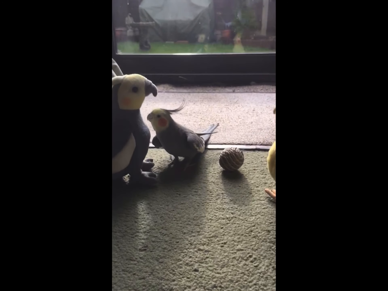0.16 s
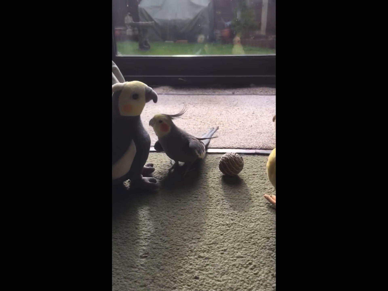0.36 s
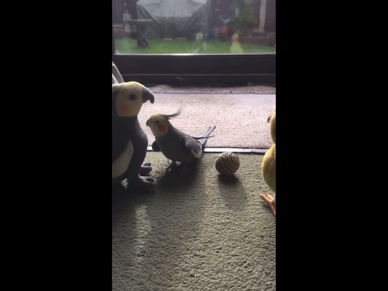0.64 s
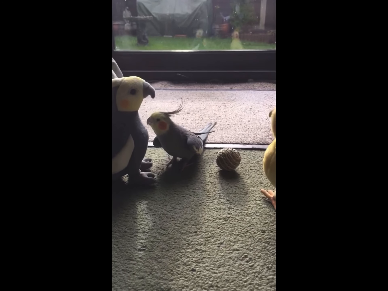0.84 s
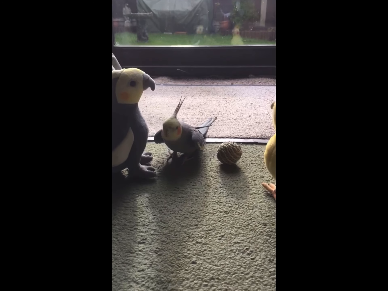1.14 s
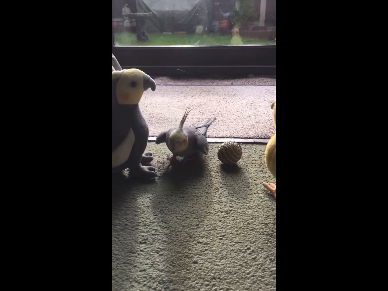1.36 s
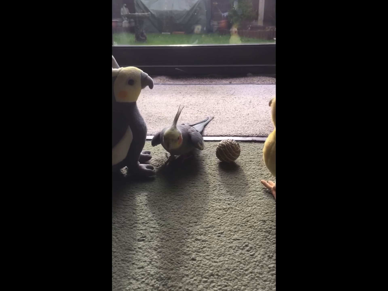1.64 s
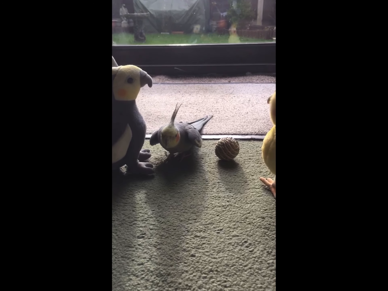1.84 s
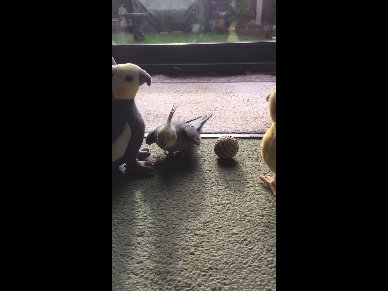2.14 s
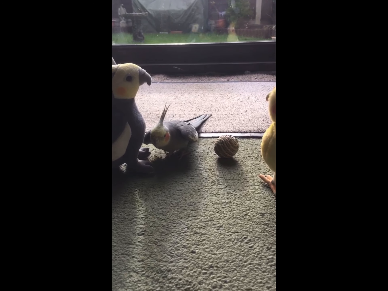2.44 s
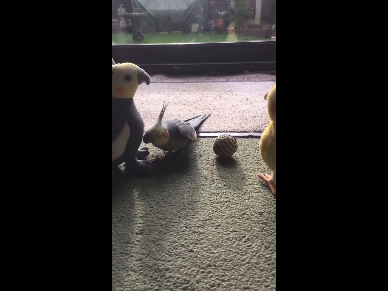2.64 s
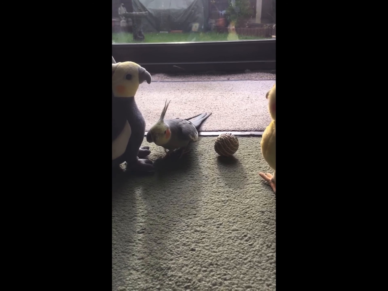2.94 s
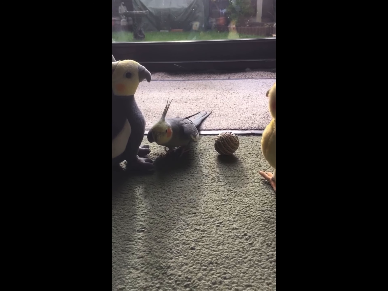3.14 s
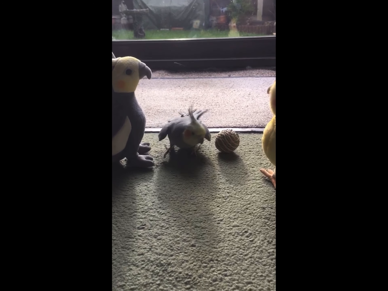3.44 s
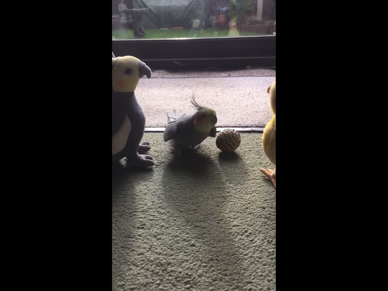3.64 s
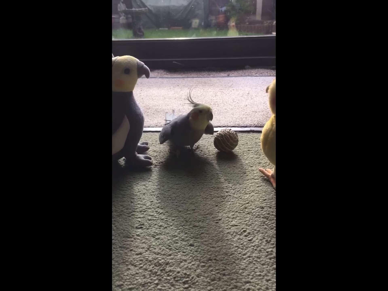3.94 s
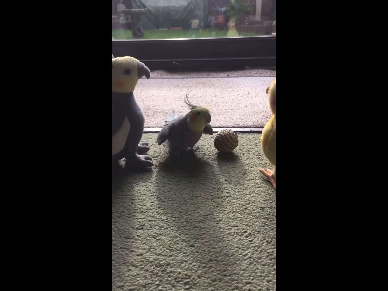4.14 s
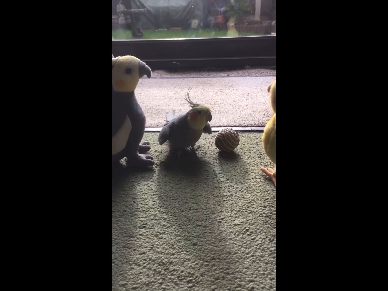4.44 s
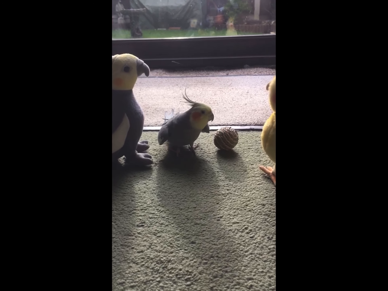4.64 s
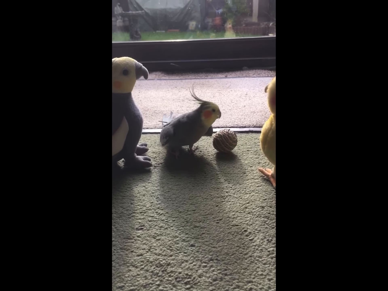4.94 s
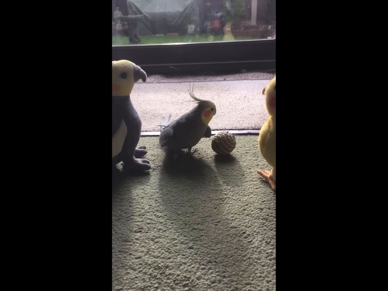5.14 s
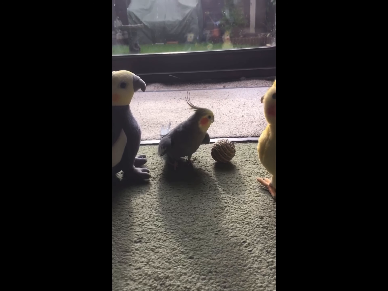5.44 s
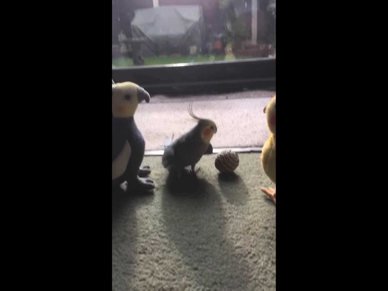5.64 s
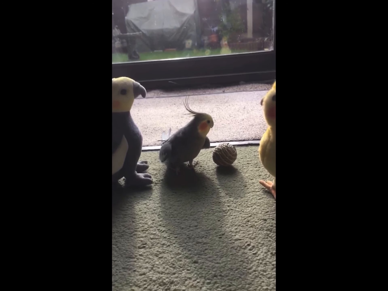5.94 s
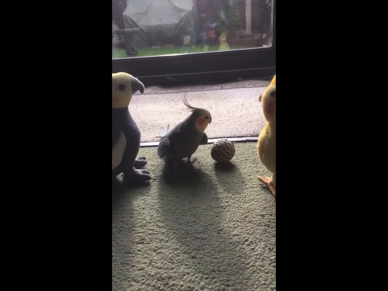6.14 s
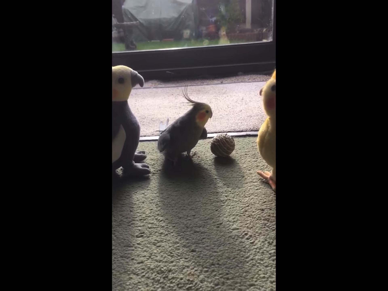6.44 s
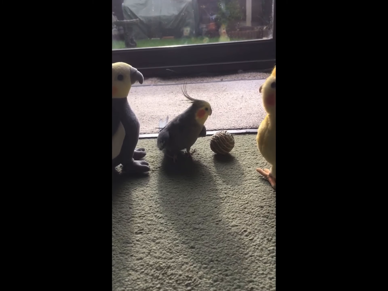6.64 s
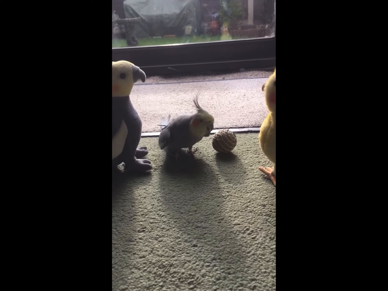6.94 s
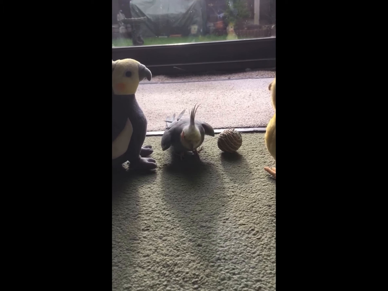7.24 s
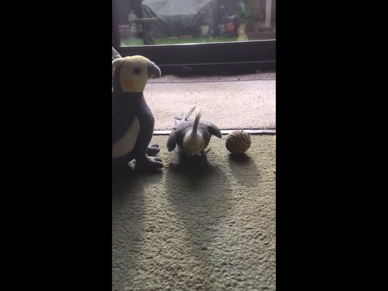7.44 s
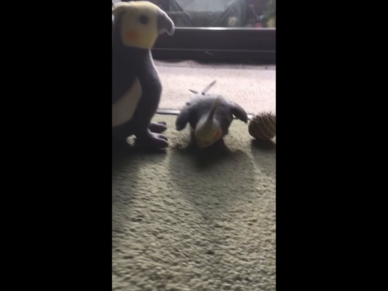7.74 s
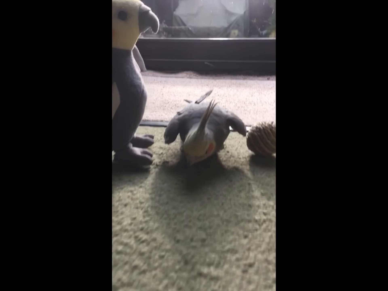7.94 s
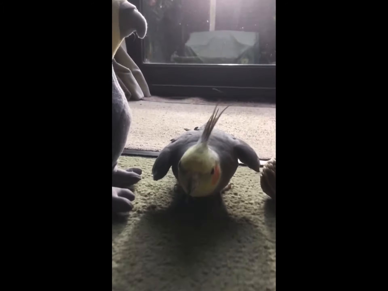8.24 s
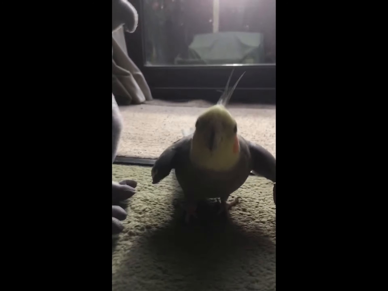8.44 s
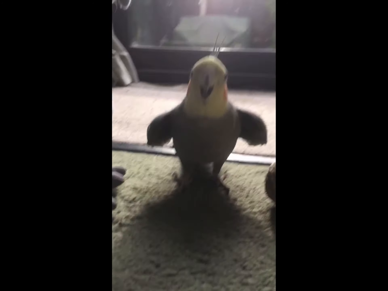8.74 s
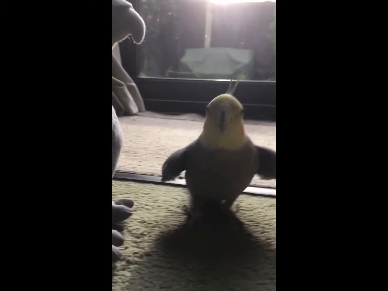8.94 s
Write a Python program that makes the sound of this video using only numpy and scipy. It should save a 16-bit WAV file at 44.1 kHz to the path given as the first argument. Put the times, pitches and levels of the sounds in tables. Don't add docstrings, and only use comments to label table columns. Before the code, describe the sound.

In a soft, carpeted living room with a short decay, a small parrot whistles over a very faint steady low hum. The tail of a closing note is heard at 0 s, then phrases begin near 0.7, 1.6, 2.75, 3.5, 4.5, 5.3, 6.5, 7.2 and 8.1 s. Each lasts about half a second: a short rising note near 1.1 kHz, a low swell, a fast leap to a thin whistle around 2.4 kHz, a drop with a tiny click, then a strong closing note near 2 kHz. Purer soft openings alternate with brighter bold ones. A tiny gulp falls at 5 s; a broken-off note comes at 6.4 s. From 7.6 s the phone microphone scuffs along carpet, hissing hardest around 8.4 to 8.5 s, with low bumps and sharp ticks from 8.2 to 8.8 s. The close phrase is loudest; scuffing fades, and another phrase is cut off at 9.1 s.

```python
import sys
import numpy as np
from scipy import signal
from scipy.fft import rfft, irfft
from scipy.io import wavfile
from scipy.ndimage import uniform_filter1d

SR = 44100
rng = np.random.default_rng(int(sys.argv[2]) if len(sys.argv) > 2 else 0)


def convert_level_to_amplitude(level_db):
    exponent = np.asarray(level_db, float) / 20
    return 10 ** exponent


def transcribe(u):
    v = np.clip(np.atleast_2d(u).T, -1, 1)
    q = np.round(v * 32767).astype(np.int16)
    wavfile.write(sys.argv[1], SR, q)


N = 400869

# frequency in Hz, density in dB per Hz.
HOUSE_SPECTRUM = [(24, -22.5), (40, -9.5), (90, -3.), (125, -6.5), (262, -6), (320, -13), (440, -18.5),
                  (1130, -21), (2300, -32.5), (6000, -41.5), (15900, -43.5)]
# frequency in Hz, width in Hz, lift in dB.
HOUSE_MODES = [(45.6, 14, 10), (83.5, 6.7, 6.5), (161, 5.9, 10), (211, 8.3, 7), (635, 100, 8.5)]
# time in seconds, level in dB.
HOUSE_LEVEL = [(0, -55), (9.09, -54)]
# time in seconds, scuff in dB, fibre hiss in dB.
SLIDE = [
    (7.6, -52, -72),
    (7.78, -54.5, -77),
    (7.92, -47, -73),
    (8.1, -51, -66),
    (8.38, -44, -50),
    (8.5, -53, -47),
    (8.72, -56.5, -72),
    (9.09, -68.5, -84),
]
# frequency in Hz, density in dB per Hz.
SCUFF_SPECTRUM = [(200, -29.5), (300, -10), (440, -10), (700, -5.5), (3000, -9), (9000, -26)]
# time in seconds, peak in dB, ring in Hz.
BUMPS = [
    (8.249, -36, 83.4),
    (8.33, -33, 88),
    (8.429, -31, 90),
    (8.456, -24.5, 53.8),
    (8.677, -36.5, 43.1),
    (8.789, -39, 43.1),
]
# time in seconds, peak in dB, ring in Hz, ring time in quarter milliseconds.
TICKS = [
    (7.069, -66.5, 780, 2.7),
    (8.232, -37, 812, 2.1),
    (8.416, -20.5, 750, 0.78),
    (8.54, -31, 800.0, 1.9),
]
# centre in Hz, T60 in seconds.
ROOM_T60 = [(700, 0.27), (1400, 0.19), (2800, 0.19), (5600, 0.18), (11200, 0.12)]
EARLY_LIFT, EARLY_S = 0.6, 0.025

# frequency in Hz, gain in dB.
THROAT = [(2000, 0.5), (2800, -4.5), (3900, -0.5), (5000, -11.5), (6000, -13), (7000, -8.5)]
# frequency in Hz, gain in dB.
BEAK = [(7000, -5), (8500, -3.5), (10000, -6.5), (12000, 4), (14000, -3.5), (16500, -5)]
# start in seconds, end in seconds, dB re fundamental.
DOUBLING = [(1.665, 1.76, -25), (4.596, 4.71, -24.5)]
# start in seconds, end in seconds, level in dB, offset above tone in Hz.
STRAIN = [(3.05, 3.119, -30, 440), (8.493, 8.521, -21, 421)]
# time in seconds, room share in dB, then lifts in dB of the upper throat,
# the beak and the lowest overtone.
STANCE = [(0.05, 6, -8, -4.5, 1), (0.85, 0, -8, -2.2, 5.5), (1.2, -2, -2, 2.5, 7),
          (1.7, -2.5, -2.5, 0.1, -6), (2.05, 0, -7.5, 1.5, 3.5), (2.85, -2, -9, 1.5, 4),
          (3.2, 0.5, 1, 2.5, 6.3), (3.62, -4.5, 2.5, 2, -2), (4.0, -1.5, -2, -3.5, 6.8),
          (4.6, -6.5, -9, 3.5, -1.8), (4.95, 3.5, -7, -4.3, 3.5), (5.55, 0, -7.5, -1.7, -4.7),
          (6.55, -2.5, -24, 1, 6), (6.9, 3.5, -7.5, -6, 5.2), (7.3, -2, 9.5, 8, -4),
          (7.6, -3, -17, 2.5, -6.5), (8.5, -10.5, 6, 8, 6), (9.05, -5.5, -10.5, -12.5, 3.5)]

# start in seconds, crest in seconds, crest in Hz,
# fundamental in dB, overtones in dB.
OPENINGS = [(0.735, 0.814, 1133, -43.5, -42.5), (1.596, 1.668, 1336, -37, -36.5),
            (2.752, 2.79, 1000, -40.5, -51), (3.533, 3.606, 1317, -36.5, -35.5),
            (4.481, 4.548, 1173, -37.5, -37.5), (5.287, 5.348, 1279, -40.5, -40.5),
            (6.479, 6.505, 1100, -35.5, -49.5), (7.197, 7.3, 1273, -36, -40.5),
            (8.142, 8.241, 1112, -31, -42), (8.983, 9.045, 1103, -34.5, -36.5)]
FALSE_START = (6.385, 6.417, 1006, -39.5, -59)
# foot in seconds, foot in Hz, crest in seconds, crest in Hz, valley in seconds.
SWELLS = [(0.87, 1025, 0.94, 1350, 0.99), (1.698, 1287, 1.784, 1380, 1.812),
          (2.84, 1015, 2.93, 1300, 2.995), (3.674, 1420, 3.722, 1600, 3.755),
          (4.622, 1083, 4.675, 1422, 4.729), (5.396, 1330, 5.462, 1406, 5.484),
          (6.535, 1072, 6.603, 1305, 6.665), (7.33, 1350, 7.368, 1400, 7.423),
          (8.291, 1012, 8.357, 1350, 8.425), (9.067, 1260, 9.1, 1400, 9.13)]
# leap in seconds, top in seconds, release in seconds, top in Hz.
ARCHES = [(1.003, 1.075, 1.094, 2455), (1.838, 1.922, 1.935, 2501), (3.012, 3.093, 3.108, 2547),
          (3.793, 3.859, 3.881, 2392), (4.739, 4.808, 4.834, 2405), (5.52, 5.599, 5.617, 2492),
          (6.673, 6.748, 6.763, 2425), (7.439, 7.508, 7.529, 2410), (8.428, 8.514, 8.524, 2545)]
# ledge in seconds, crest in seconds,
# end in seconds, ledge in Hz, crest in Hz.
CLOSINGS = [(-0.026, 0.046, 0.078, 1780, 2085), (1.167, 1.239, 1.273, 1720, 2050),
            (2.011, 2.083, 2.117, 1835, 2102), (3.183, 3.253, 3.267, 2005, 2065),
            (3.961, 4.037, 4.059, 1710, 1976), (4.915, 4.989, 5.021, 1760, 2074),
            (5.699, 5.777, 5.811, 1790, 2043), (6.838, 6.912, 6.938, 1900, 2085),
            (7.613, 7.689, 7.705, 1815, 1907), (8.602, 8.674, 8.698, 1810, 2105)]
# swell foot in dB, swell crest in dB, crest overtones in dB, closing in dB,
# closing overtones in dB.
EFFORT = [(-48, -30.5, -55.5, -26.5, -28.5), (-39, -30, -50.5, -24.5, -31), (-35.5, -29.5, -50, -25.5, -29),
          (-29.5, -29, -43.5, -27, -24), (-32, -29, -55, -26.5, -31.5), (-41, -30, -49, -25.5, -35.5),
          (-32.5, -31.5, -54.5, -25.5, -30.5), (-31.5, -27, -51, -18.5, -32.5),
          (-26.5, -21.5, -49, -20.5, -23), (-34.5, -40, -23.5, -30, -35.5)]
ARCH_FORCE_DB = [0, -1.1, -1, 0, -2, 0, -1.4, -1.3, 8]
# offset in seconds, share of the way from rest to top pitch, tone, throat, beak in dB.
LEAP = [(0, .05, -34, -66.5, -81.5), (0.022, 0.606, -35.5, -57, -70.5), (0.037, .8, -22.5, -53, -54.5)]
TOP = [(-.022, .925, -20, -61, -54.5), (0, 0.99, -18.5, -56, -51)]
RELEASE = [(0, 0.94, -19.5, -56.5, -49), (.012, .62, -35.5, -64.5, -61.5), (0.026, .12, -36, -66, -71.5),
           (.04, 0.013, -36.5, -69, -73.5)]
# offset from ledge in seconds, pitch in Hz, tone, throat, beak in dB re effort.
FOOT = (-.024, 1110.5, -12, -43, -45)
# offset in seconds, share of ledge pitch, tone, throat, beak in dB re effort.
LEDGE = [(0, 1.02, -9.5, -24.5, -35.5), (.025, .99, -1.5, -8.5, -31)]
# share of time from crest to end, share of crest pitch, tone, throat, beak in dB re effort.
CREST = [(0, 1.005, 0, -1, -23), (.55, .97, -1, 4.5, -24.5), (1.002, 0.93, -10, 3, -27.5)]
# share of time, share of height, tone in dB, overtones in dB.
SHOULDER = (0.36, 0.88, -1.5, -9)
# start in seconds, length in seconds, level in dB, from Hz, to Hz.
GULP = (5.014, .012, -39, 1900, 550)

REST_HZ, START_HZ, VALLEY_HZ = 1031, 1050, {"soft": 1071, "bold": 1000}
DIP_SHARE, START_DB, DIP_DB = 0.19, (-7.5, -41.5, -19), (-3, -15, -17.5)
BEAK_UNDER_DB = {"soft": -25, "bold": -16}
FOOT_OVERTONES_DB = {"soft": -23, "bold": 2.8}
VALLEY_DB = (-5.5, -64.5, -83.5)
BREAK_S, BREAK_DB = 0.024, -20
REST_FOLLOWS = 0.23
UPPER_FOLLOWS = 0.2
SNAP_AFTER_S, SNAP_DB, SNAP_HZ, SNAP_RING_S = 0.018, -49, 850, 0.0019


def rms_one(x):
    return x / np.sqrt(np.mean(x ** 2) + 1e-20)


def at_hz(points, hz):
    points = np.array(points)
    return np.interp(np.log(hz), np.log(points[:, 0]), points[:, 1])


def in_time(rows, t):
    s, *columns = np.transpose(rows)
    return [np.interp(t, s, c) for c in columns]


def drift(rate_hz, count=N):
    r = np.exp(-2 * np.pi * rate_hz / SR)
    settle = 2000
    white = rng.standard_normal((count // 30000 + 1) * 30000 + settle)
    return rms_one(signal.lfilter([1], [1, -2 * r, r * r], white)[settle:][:count])


def swell(t, start, end):
    return np.sin(np.pi * np.clip((t - start) / (end - start), 0, 1))


def octave_or_band(x, low_hz, high_hz):
    return signal.sosfilt(signal.butter(2, [low_hz, high_hz], "band", fs=SR, output="sos"), x)


def coloured(spectrum, modes=()):
    hz = np.maximum(np.fft.rfftfreq(N, 1 / SR), 1)
    level_db = at_hz(spectrum, hz)
    for mode_hz, width_hz, lift_db in modes:
        level_db = level_db + lift_db / (1 + (2 * (hz - mode_hz) / width_hz) ** 2)
    return rms_one(irfft(rfft(rng.standard_normal(N)) * convert_level_to_amplitude(level_db), N))


def knocks(events):
    out = np.zeros(N + SR)
    t = np.arange(SR // 5) / SR
    for s, db, hz, ring_s in events:
        envelope = np.exp(1 - t / ring_s) * t / ring_s
        out[round(s * SR):][:len(t)] += convert_level_to_amplitude(db) * np.sin(2 * np.pi * hz * t) * envelope
    return out[:N]


def house(t):
    return convert_level_to_amplitude(in_time(HOUSE_LEVEL, t)[0]) * coloured(HOUSE_SPECTRUM, HOUSE_MODES)


def slide(t):
    scuff_db, hiss_db = in_time(SLIDE, t)
    since_s = t - SLIDE[0][0]
    touching = np.clip(since_s * 10, 0, 1)
    scuff = convert_level_to_amplitude(scuff_db) * coloured(SCUFF_SPECTRUM)
    hiss = coloured([(2500, -17.0), (5000, -25.5), (15000, -15.5)])
    hiss = convert_level_to_amplitude(hiss_db + 2.2 * drift(25)) * hiss
    boom = convert_level_to_amplitude(-54.0) * coloured([(160, -19.0), (230, -3.0), (300, -0.5), (380, -64.0)])
    return touching * (scuff + hiss + boom * np.clip(since_s, 0, 0.7) / 0.68)


def bumps():
    return knocks([(s - 0.012, db, hz, 0.14 / hz) for s, db, hz in BUMPS])


def ticks():
    return knocks([(s, db, hz, ms / 4000) for s, db, hz, ms in TICKS])


def room(x, first_s=0.004, sparse_db=4.5):
    t = np.arange(SR // 2) / SR
    unevenness_db = sparse_db * drift(200, count=len(t)) * np.exp(-t / 0.067)
    echoes = rng.standard_normal(len(t)) * convert_level_to_amplitude(unevenness_db) * (t > first_s)
    echoes = echoes * (1 + EARLY_LIFT * np.exp(-t / EARLY_S))
    tail = 0
    for hz, t60_s in ROOM_T60:
        tail = tail + octave_or_band(echoes, hz / np.sqrt(2), hz * np.sqrt(2)) * convert_level_to_amplitude(-60 * t / t60_s)
    return signal.fftconvolve(x, tail / np.sqrt(np.sum(tail ** 2)))[:N]


def gulp(t):
    start, length, db, from_hz, to_hz = GULP
    part = np.clip((t - start) / length, 0, 1)
    phase = 2 * np.pi * np.cumsum(from_hz * (to_hz / from_hz) ** part) / SR
    return convert_level_to_amplitude(db) * np.sin(phase) * swell(t, start, start + length)


def snaps():
    return knocks([(release + SNAP_AFTER_S, SNAP_DB, SNAP_HZ, SNAP_RING_S) for _, _, release, *_ in ARCHES])


def opening(kind, start, crest, hz, tone_db, throat_db):
    top = np.array([tone_db, throat_db, throat_db + BEAK_UNDER_DB[kind]])
    dip = start + DIP_SHARE * (crest - start)
    return [(start, START_HZ, *(top + START_DB)), (dip, REST_HZ, *(top + DIP_DB)), (crest, hz, *top)]


def hump(kind, row, effort, opening_db):
    foot, foot_hz, crest, crest_hz, valley = row
    foot_tone_db, crest_db, upper_db = effort[:3]
    late, high, fall_db, shut_db = SHOULDER
    foot_db, under_db = opening_db + FOOT_OVERTONES_DB[kind], BEAK_UNDER_DB[kind]
    valley_hz = VALLEY_HZ[kind]
    return [(foot, foot_hz, foot_tone_db, foot_db, foot_db + under_db),
            (crest, crest_hz, crest_db, upper_db, upper_db + under_db),
            (crest + late * (valley - crest), valley_hz + high * (crest_hz - valley_hz),
             crest_db + fall_db, upper_db + shut_db, upper_db + under_db + shut_db),
            (valley, valley_hz, crest_db + VALLEY_DB[0], *VALLEY_DB[1:])]


def arch(leap, top, release, top_hz, force_db):
    force = force_db * np.array([1, UPPER_FOLLOWS, UPPER_FOLLOWS])
    points = []
    for at, pattern in ((leap, LEAP), (top, TOP), (release, RELEASE)):
        for s, share, *db in pattern:
            level = db + force * (REST_FOLLOWS + (1 - REST_FOLLOWS) * share)
            points.append((at + s, REST_HZ + share * (top_hz - REST_HZ), *level))
    return points


def closing(row, tone_db, upper_db):
    ledge, crest, end, ledge_hz, crest_hz = row
    force = np.array([tone_db, upper_db, upper_db])
    points = [(ledge + FOOT[0], FOOT[1], *(force + FOOT[2:]))]
    points += [(ledge + s, share * ledge_hz, *(force + db)) for s, share, *db in LEDGE]
    points += [(crest + part * (end - crest), share * crest_hz, *(force + db)) for part, share, *db in CREST]
    return points


def song():
    broken = opening("soft", *FALSE_START)
    broken.append(np.add(broken[-1], (BREAK_S, 0, BREAK_DB, BREAK_DB, BREAK_DB)))
    phrases = [closing(CLOSINGS[0], *EFFORT[-1][3:]), broken]
    for k, first in enumerate(OPENINGS):
        kind = ("soft", "bold")[k % 2]
        rows = opening(kind, *first) + hump(kind, SWELLS[k], EFFORT[k], first[4])
        if k < len(ARCHES):
            rows += arch(*ARCHES[k], ARCH_FORCE_DB[k]) + closing(CLOSINGS[k + 1], *EFFORT[k][3:])
        phrases.append(sorted(rows))
    return phrases


def overtones(pitch, phase, colour, low_hz, high_hz, rasp, lift_db=0, lowest_db=0):
    sound, power = 0, 1e-12
    slack = np.clip((1900 - pitch) / 500, 0.4, 1)
    for k in range(2, 16):
        hz = k * pitch
        inside = np.clip((hz - low_hz) / 300, 0, 1) * np.clip((high_hz - hz) / 300, 0, 1)
        gain_db = at_hz(colour, hz) + lift_db * np.clip(hz / 1000 - 4.3, 0, 1) + lowest_db * (k == 2)
        gain = convert_level_to_amplitude(gain_db) * inside
        waver = convert_level_to_amplitude(3.63 * drift(43, count=len(hz)))
        waver = waver * (1 + rasp * slack * hz / 10000 * drift(170, count=len(hz)))
        sound = sound + gain * waver * np.sin(k * phase + k * k)
        power = power + gain ** 2
    return sound / np.sqrt(power)


def syrinx_tone(t, phase):
    tone = np.sin(phase)
    for start, end, db in DOUBLING:
        tone += convert_level_to_amplitude(db) * (np.sin(phase / 2) + np.sin(3 * phase / 2)) * swell(t, start, end)
    for start, end, db, above_hz in STRAIN:
        flutter = 2 * np.pi * above_hz * t + 1.3 * drift(90, count=len(t))
        side = sum(convert_level_to_amplitude(db - 7.6 * k) * np.sin(phase + (k + 1) * flutter) for k in range(4))
        tone += side * swell(t, start, end)
    return tone


def phrase(rows, droop=0.072, release_s=0.015, jitter=0.001, puff_db=-16.5, grain=0.061):
    t = np.arange(round(rows[0][0] * SR), round(rows[-1][0] * SR)) / SR
    pitch, tone_db, throat_db, beak_db = in_time(rows, t)
    pitch = uniform_filter1d(uniform_filter1d(pitch, size=150), size=150)
    sag = droop * np.clip(1 - (t[-1] - t) / release_s, 0, 1) ** 2
    phase = 2 * np.pi * np.cumsum(pitch * (1 - sag + jitter * drift(61, count=len(t)))) / SR
    tone = syrinx_tone(t, phase)
    _, lift_db, turn_db, lowest_db = in_time(STANCE, t)
    throat = overtones(pitch, phase, THROAT, 1500, 6950, rasp=0.41, lift_db=lift_db, lowest_db=lowest_db)
    beak = overtones(pitch, phase, BEAK, 6800, SR / 2.6, rasp=0.6)
    upper = convert_level_to_amplitude(throat_db) * throat + convert_level_to_amplitude(beak_db + turn_db) * beak
    upper *= 1 + grain * np.clip((1900 - pitch) / 500, 0.2, 1) * drift(1000, count=len(t))
    puff = octave_or_band(rng.standard_normal(SR), 1500, 6000)[:len(t)]
    upper += convert_level_to_amplitude(tone_db[0] + puff_db) * puff * np.exp(-(t - t[0]) / 0.015)
    edge = np.minimum(np.minimum(t - t[0], t[-1] - t) / 0.0016, 1)
    return np.sqrt(2) * np.array([convert_level_to_amplitude(tone_db) * tone, upper]) * edge


def bird():
    out = np.zeros((2, N + 2 * SR))
    for rows in song():
        sound, at = phrase(rows), SR + round(rows[0][0] * SR)
        out[:, at:at + sound.shape[1]] += sound
    return out[:, SR:SR + N]


def scene():
    t = np.arange(N) / SR
    tone, upper = bird()
    tone = convert_level_to_amplitude(-1.0) * tone + ticks() + snaps()
    wet = room((tone + upper) * convert_level_to_amplitude(in_time(STANCE, t)[0]))
    direct = tone + convert_level_to_amplitude(2.0) * upper
    return (direct + wet + gulp(t) + house(t) + slide(t) + bumps())[None]


def roll_off(x):
    return signal.sosfilt(signal.butter(12, 16010, fs=SR, output="sos"), x)


def record(dry):
    dry = signal.sosfilt(signal.butter(4, 36, "high", fs=SR, output="sos"), dry)
    dry = signal.sosfilt(signal.cheby2(14, 50, 16100, fs=SR, output="sos"), dry)
    return roll_off(dry)


dry = scene()
out = record(dry)
transcribe(out)
```